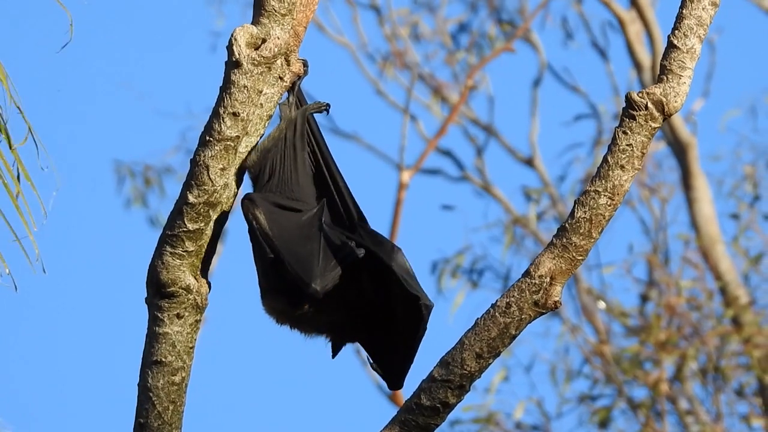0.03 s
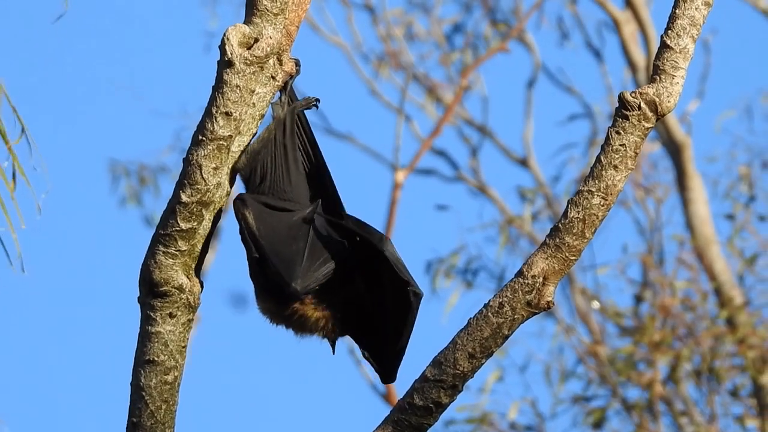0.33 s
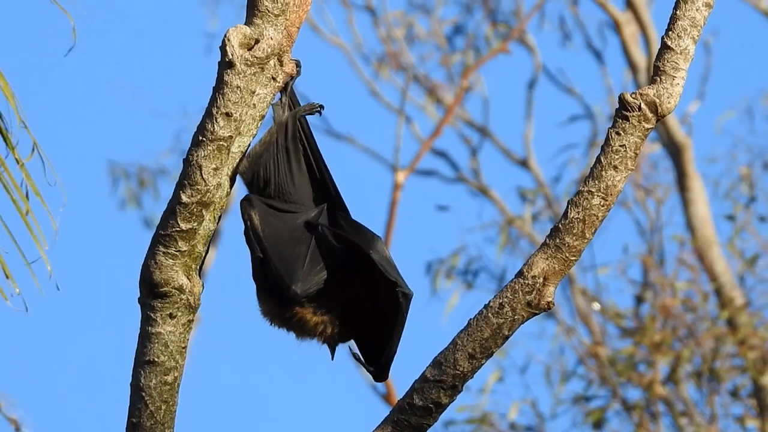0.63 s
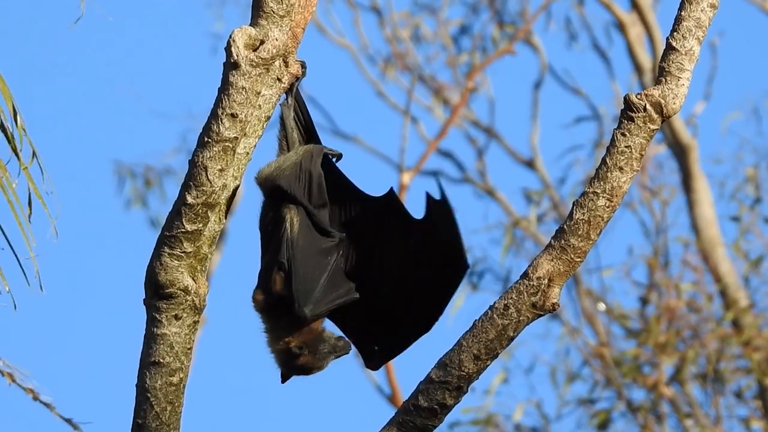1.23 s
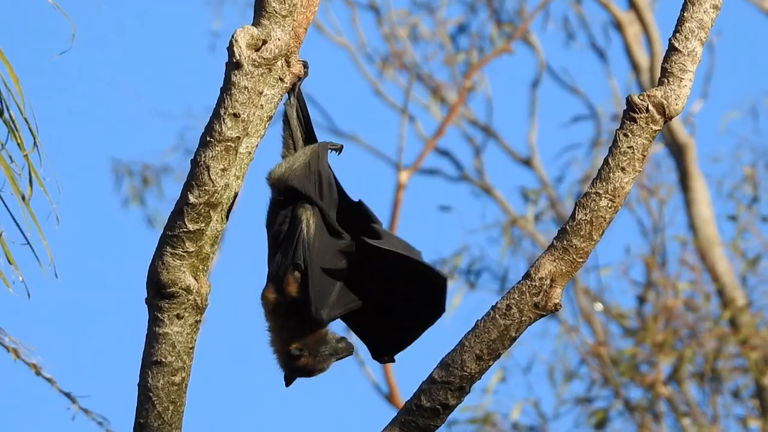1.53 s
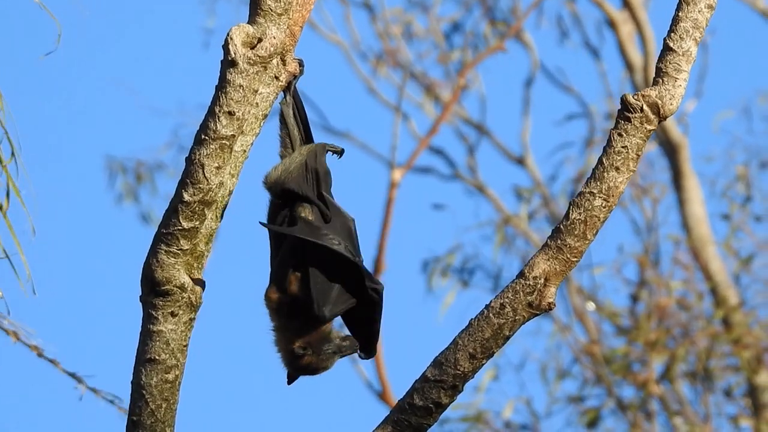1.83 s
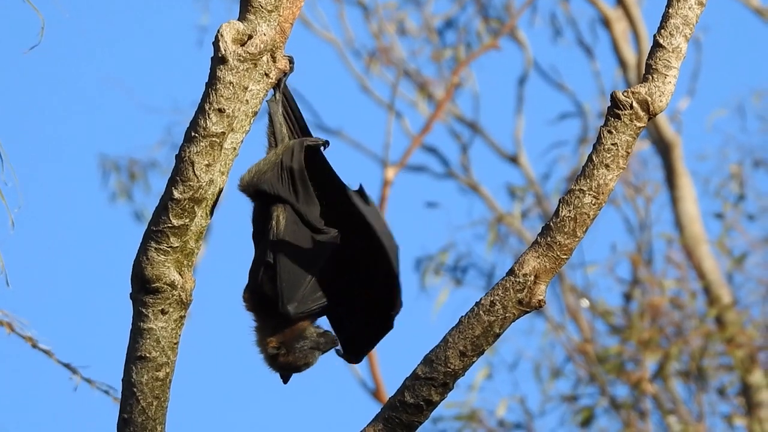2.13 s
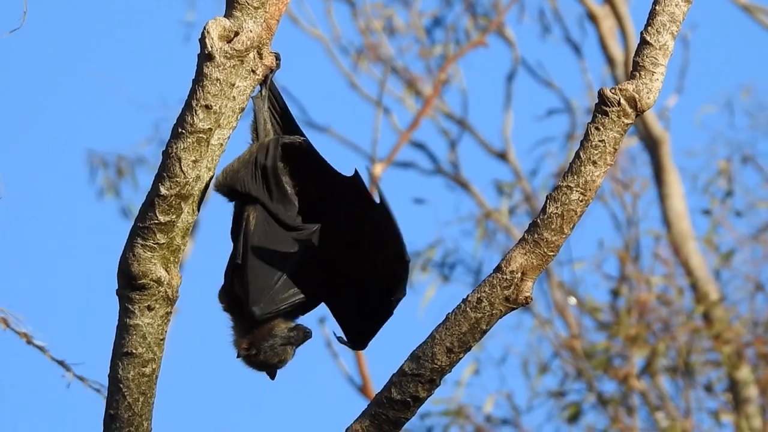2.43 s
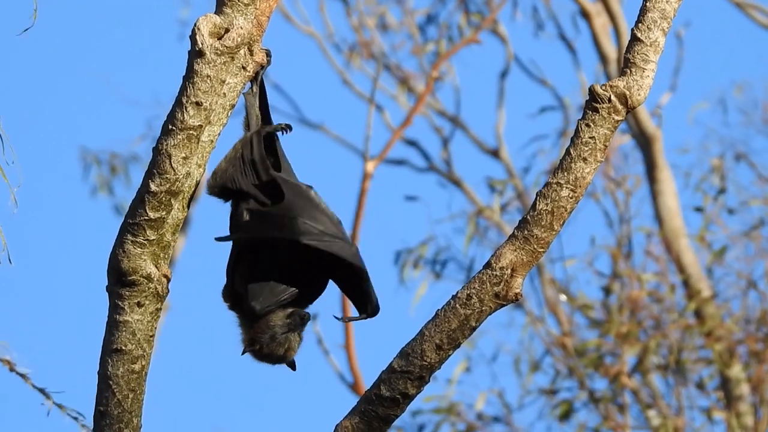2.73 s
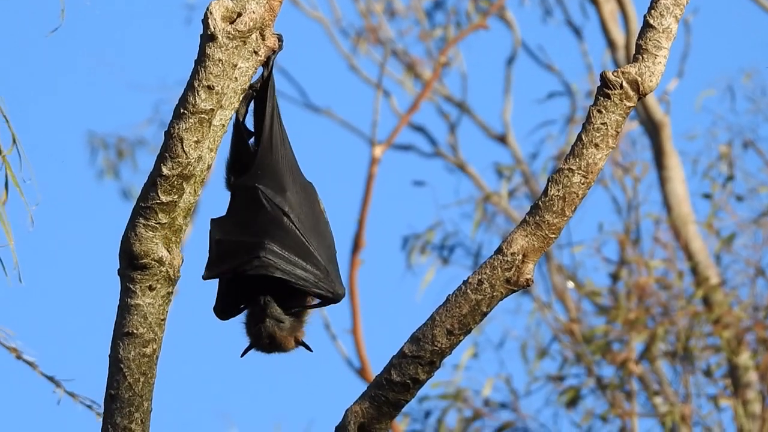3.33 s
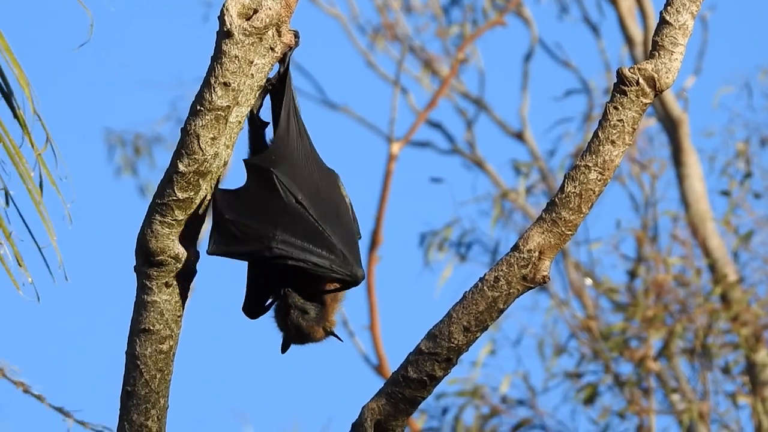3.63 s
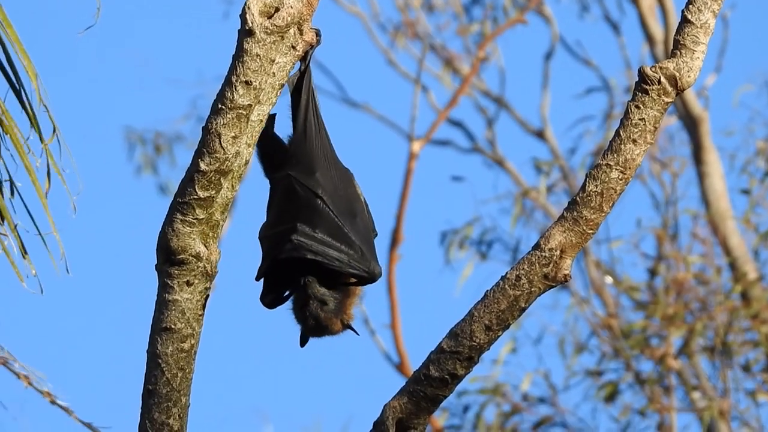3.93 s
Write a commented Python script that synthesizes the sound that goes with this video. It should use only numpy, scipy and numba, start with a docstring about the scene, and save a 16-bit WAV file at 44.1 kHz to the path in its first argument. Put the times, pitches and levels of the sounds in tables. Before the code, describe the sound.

Flying fox bats squabble in trees outdoors: one close bat repeats wavering whines that break into rasps, overlapped by its neighbours' screeches and squeals. Steady colony chatter, faint wind and a low distant hum lie underneath.

```python
"""A flying fox whines in the trees, in long phrases that break into rasps as it pushes harder.
A rival whines across it; neighbours answer with high squeals, harsh screeches and whistled squeaks.
The cries follow the source-filter principle: throat and mouth resonances shape a train of larynx
pulses, which turns rough when its cycles grow irregular. The rest of the colony chatters behind,
scattered by the branches, over faint wind and a low distant drone."""
import sys
import numpy as np
from scipy import signal
from scipy.fft import rfft, irfft
from scipy.io import wavfile
from scipy.ndimage import uniform_filter1d
from numba import njit

SR = 44100
rng = np.random.default_rng(int(sys.argv[2]) if len(sys.argv) > 2 else 0)


def unload_audio(sound):
    """Save the sound as a 16-bit wav file, at the path given as the first command line argument."""
    columns = np.transpose(np.atleast_2d(sound))
    # keep every value between -1 and 1, then stretch to whole-number steps
    steps = np.round(np.clip(columns, -1, 1) * 32767)
    wavfile.write(sys.argv[1], SR, steps.astype(np.int16))


N = 176400

NEAR_LAG_MS, MOUTH_WIDTH_HZ, MOUTH_CUT_HZ, CHEST_DB = 0.002, 1400., 2300, -32.5
THROB_DB, THROB_HZ = 5, 43.9  # rough stretches come in uneven pushes
# Near bat, one table per phrase (time [s], pitch [Hz], roughness [0-1], mouth resonance [Hz])
PHRASES = [
    [(0, 512.5, 0.59, 2620), (.1, 590, 0.51, 3080), (.17, 571.3, 0.3, 2940), (.21, 610.6, 0.7, 3030),
     (.27, 623.5, 0.49, 3200), (.3, 606.4, .4, 3030), (.33, 636, 0.55, 3200), (.4, 605, 1, 3180)],
    [(.495, 680, 0.74, 3500), (.535, 614.6, 0.7, 3100), (.55, 503, 0.42, 3100), (.605, 513.7, 0.16, 3000),
     (.665, 494.6, 0.33, 2930), (.713, 557, 0.2, 2970), (.745, 532, 0.15, 3130), (.82, 552.3, 0.15, 3200),
     (.86, 612, 0.08, 2995), (.885, 592, 0.27, 3120), (.91, 612, 0.42, 3100), (.94, 597, 0.37, 3030),
     (.96, 569, 0.3, 2700), (1.05, 562, 0.3, 2530)],
    [(1.07, 701, 0.5, 3470), (1.1, 765, 0.58, 3770), (1.135, 650, 0.52, 3380), (1.165, 665, 0.37, 3170),
     (1.2, 724, 0.05, 3000), (1.245, 666, 0.42, 3270), (1.262, 546, 0.18, 3360), (1.31, 547, 0.13, 3040),
     (1.335, 539, 0.25, 3380), (1.37, 590, 0.38, 3150), (1.42, 609, 0.67, 3450), (1.48, 615, 0.96, 3620)],
    [(1.62, 718, 0.74, 3160), (1.67, 660.5, 0.46, 2930), (1.72, 637.6, 0.4, 2980),
     (1.79, 629.4, 0.29, 3000), (1.84, 621, 0.5, 2880), (1.87, 578, 0.29, 2520), (1.9, 597.4, 0.37, 2730),
     (1.94, 674.5, 0.24, 3330), (1.97, 668, 0.56, 3300), (2.03, 634, 0.89, 3440), (2.07, 610, 0.59, 3200),
     (2.12, 604, 0.64, 3100)],
    [(2.24, 620, 0.7, 3200), (2.28, 657, 0.7, 3200), (2.32, 683, 0.33, 3100), (2.37, 711.6, 0.22, 3050),
     (2.42, 689.6, 0.48, 3440), (2.46, 674, 0.45, 3260), (2.492, 715, 0.42, 3400), (2.55, 679, 0.41, 3300),
     (2.58, 705, 0.13, 3410), (2.62, 688, 0.48, 3350), (2.67, 679.6, 0.79, 3340), (2.74, 662, 0.55, 3500),
     (2.84, 638, 0.83, 3300)],
    [(2.93, 604, 0.74, 3000), (3.05, 637, 0.45, 3240), (3.1, 613, 0.84, 3100)],
    [(3.26, 620, 0.77, 3160), (3.3, 655, 0.46, 3300), (3.35, 680, 0.29, 3270), (3.42, 657, 0.77, 3180),
     (3.56, 641, 0.95, 3140), (3.69, 610, 1.06, 2763)],
    [(3.86, 602, 0.7, 3120), (3.92, 660, 0.26, 3330), (4, 620, 0.5, 3070)],
]
# Strength of each phrase (gain [dB])
PHRASE_DB = [-1.5, -2, -0.5, -2.5, -2, -1.5, -7, -6.5]
# Vocal effort (time [s], level [dB])
EFFORT = [(0.0, -25), (0.19, -23.5), (0.21, -18.5), (0.32, -13), (0.36, -29), (0.49, -29), (0.53, -17.5),
          (0.68, -24), (0.71, -18.5), (0.76, -21.5), (0.93, -15.5), (0.95, -22), (1.02, -28), (1.07, -58),
          (1.09, -18), (1.12, -17), (1.16, -22.5), (1.4, -17.5), (1.43, -22), (1.46, -18.5), (1.47, -26),
          (1.59, -16), (1.66, -24.5), (2.03, -16), (2.06, -10), (2.07, -24), (2.18, -22), (2.25, -21),
          (2.26, -14), (2.29, -19), (2.312, -25), (2.335, -19), (2.37, -26), (2.418, -16), (2.455, -25.5),
          (2.485, -18.5), (2.53, -25), (2.58, -18), (2.625, -27), (2.665, -18), (2.73, -19), (2.74, -27),
          (2.76, -29), (2.8, -29), (2.82, -26), (2.88, -33), (2.94, -27), (3.07, -26), (3.1, -47),
          (3.25, -18), (3.29, -15), (3.42, -28), (3.56, -24), (3.75, -26), (3.91, -24), (3.95, -41),
          (3.98, -16.5), (4.0, -19)]
# Throat formants (centre [Hz], bandwidth [Hz], gain [dB])
NEAR_THROAT = [(1680, 450, -16), (4950, 1000, -12), (7400, 1400, -17)]
def near_bat():
    """Source-filter voice: larynx pulses pass a moving mouth resonance and steady throat formants."""
    out = np.zeros(N)
    highpass = signal.butter(4, MOUTH_CUT_HZ, "highpass", fs=SR, output="sos")
    for phrase, db in zip(PHRASES, PHRASE_DB):
        t = np.arange(phrase[0][0], phrase[-1][0], 1 / SR)
        rough = np.clip(curve(phrase, t, column=2), 0, 1)
        source = larynx(curve(phrase, t), rough, subharmonic=0.4 * rough)
        tract = vocal_tract(source, curve(phrase, t, column=3), MOUTH_WIDTH_HZ, NEAR_THROAT)
        voice = signal.sosfilt(highpass, tract) + undb(CHEST_DB) * source
        voice = voice / np.sqrt(uniform_filter1d(voice ** 2, size=400) + 1e-12)  # even out the power
        throb = THROB_DB * rough * np.tanh(wander(len(t), THROB_HZ))
        envelope = undb(curve(EFFORT, t) + db + throb) * gate(len(t), attack_s=0.014, release_s=0.011)
        add(out, t[0], voice * envelope)
    return place(out, pan_db=-3, lag_ms=NEAR_LAG_MS)


WAVER, WAVER_HZ, JITTER, JITTER_HZ = .02, 120, .075, 397.1  # relative pitch spread at roughness 1, rate
SHIMMER_DB, SHIMMER_HZ, BREATH = 4, 297, 0.4
def larynx(hz, rough, subharmonic=0):
    """Phonation: one pulse per cycle; roughness brings jitter, shimmer and pulsed breath noise."""
    n, harmonics = len(hz), int(13000 / hz.max())

    def pulses(phase):
        """Equal harmonics sum to pulses; strong-weak alternation adds the octave below."""
        train = np.sin((harmonics + .5) * phase) / (np.sin(phase / 2) + 1e-12) - 1
        return unit(train) * (1 + subharmonic * np.cos(phase / 2))

    steady_phase = 2 * np.pi * np.cumsum(hz * (1 + WAVER * np.sqrt(rough) * wander(n, WAVER_HZ))) / SR
    shaken_phase = steady_phase + 2 * np.pi * np.cumsum(hz * JITTER * rough * wander(n, JITTER_HZ)) / SR
    air = unit(rng.standard_normal(SR)[np.arange(n) % SR] * (1 + np.cos(shaken_phase)))
    shimmer = undb(SHIMMER_DB * np.tanh(wander(n, SHIMMER_HZ)))
    rasp = (pulses(shaken_phase) + BREATH * air) * shimmer
    return (1 - rough) ** 2 * pulses(steady_phase) + rough * rasp


def vocal_tract(source, mouth_hz, width_hz, formants):
    """Formant filtering: a moving mouth resonance in parallel with those of the throat."""
    mouth = sweep(sweep(source, mouth_hz, width_hz), mouth_hz, width_hz)
    throat = sum(undb(db) * resonate(source, hz, width) for hz, width, db in formants)
    return mouth + throat


def calls(rows, formants, arch):
    """Formant tracking: the mouth resonance follows the arching, gliding pitch of each short call."""
    out = np.zeros(N)
    for start, length, hz, rise, db, rough, mouth_hz in rows:
        u = np.linspace(-1, 1, int(length * SR))
        pitch = hz * (1 + arch * (.5 - u ** 2)) + rise * u / 2
        source = larynx(pitch, np.clip(rough, 0, 1), subharmonic=0.06)
        voice = vocal_tract(source, mouth_hz * pitch / hz, width_hz=750., formants=formants)
        add(out, start, unit(voice) * undb(db) * gate(len(u)))
    return out


# Whines (start [s], length [s], pitch [Hz], rise [Hz], level [dB], roughness [0-1], mouth [Hz])
WHINES = [(.255, .085, 775, 42, -27, .3, 3100), (.355, 0.071, 698, 5, -26.5, 0.2, 4200),
          (.585, 0.088, 632, -29, -31, 0.16, 2640), (.885, .06, 905, 92, -26, .2, 3500),
          (.96, .08, 535, -5, -32.5, .25, 2200), (1.19, .17, 600, 33, -29.5, .6, 3100),
          (1.39, .055, 835, 57, -27, .3, 4000), (1.935, .045, 612, -12, -29, .2, 4400),
          (2.12, .12, 600, 15, -31.5, .6, 2900), (2.355, .045, 720, 28, -24, .15, 2850),
          (2.47, .17, 628, -9.5, -34.5, 0.48, 3110), (2.57, .15, 719, 43.5, -33.5, 0.25, 4950)]
# Throat formants (centre [Hz], bandwidth [Hz], gain [dB])
WHINE_THROAT = [(4700, 1000, -15), (7200, 1200, -17)]
def rival_whines():
    """Mostly periodic pulses give the rival a harmonic whine close to the near bat's pitch."""
    return place(calls(WHINES, WHINE_THROAT, arch=.012), pan_db=-3, lag_ms=NEAR_LAG_MS)


# Squeals (start [s], length [s], pitch [Hz], rise [Hz], level [dB], roughness [0-1], mouth [Hz])
SQUEALS = [(.32, .1, 1131, 8, -27.5, 0.42, 4500), (.415, 0.047, 1170, 13, -24.5, .22, 4800),
           (.945, 0.11, 1212, 68, -26, .22, 4850), (1.495, 0.055, 1125, 41, -22.5, .25, 5430),
           (1.535, 0.046, 1204, 10, -23.5, 0.1, 4910), (2.128, 0.088, 1200, 20, -23, 0.3, 4800),
           (2.205, 0.063, 1250, -10, -27.5, 0.17, 6200), (3.64, 0.14, 1158, -55, -38, .4, 4500),
           (3.79, 0.09, 1220, 11, -30, 0.64, 5300)]
# Throat formants (centre [Hz], bandwidth [Hz], gain [dB])
SQUEAL_THROAT = [(1150, 2200, -10), (2420, 400, -12), (4530, 2600, -1), (6060, 910, 0)]
def squeals():
    """A fast pulse rate gives a neighbour's squeals high pitch and widely spaced harmonics."""
    return place(calls(SQUEALS, SQUEAL_THROAT, arch=0.0158), pan_db=-1, lag_ms=0.0062)


# Screeches (start [s], length [s], pitch [Hz], rise [Hz], level [dB], roughness [0-1], mouth [Hz])
SCREECHES = [(.055, .025, 915, 16, -36, .8, 6750), (.138, 0.035, 678, 28, -16, 0.37, 6200),
             (.17, 0.073, 786, -2, -25.5, .8, 4700), (.203, 0.043, 709, 3, -19, 0.27, 6660),
             (.245, 0.018, 795, -22, -20, 0.5, 6250), (.29, 0.2, 802, 14.5, -30, 0.6, 6300),
             (.503, 0.031, 720, 3, -25.5, 0.55, 4400), (.58, 0.061, 938, 18, -27.5, 0.86, 6800),
             (.87, 0.18, 896, 56.5, -24.5, 0.79, 6460), (1.085, .04, 725, -68, -23.5, 0.67, 4380),
             (1.4, 0.11, 857, 60.5, -26, 0.76, 6600), (1.52, .14, 996, -85, -26.5, 0.63, 6000),
             (1.62, 0.061, 873, 19, -29, 0.37, 4400), (1.83, 0.05, 904, 6, -45, 0.4, 5700),
             (2.02, 0.1, 850, 45.5, -28, 0.85, 6800), (2.255, .05, 926, -100, -26, 0.81, 5150),
             (2.63, 0.16, 903, 6.5, -28, 1.06, 5100), (2.8, 0.053, 842, -63, -26.5, 0.72, 5500),
             (3.31, 0.13, 897, -12, -28.5, 0.95, 5570), (3.47, 0.13, 954, -47, -27.5, 1, 6250),
             (3.825, 0.064, 1032, -9, -24.5, 0.67, 5960), (3.93, 0.051, 944, 165, -30.5, 0.7, 6400)]
# Throat formants (centre [Hz], bandwidth [Hz], gain [dB])
SCREECH_THROAT = [(4730, 390, 0.5), (5880, 3400, -12), (6820, 1050, -2.5)]
def screeches():
    """Aperiodic vibration smears the harmonics into harsh noise under high formants."""
    return place(calls(SCREECHES, SCREECH_THROAT, arch=.05), pan_db=0.5, lag_ms=0.0052)


# Whistled squeaks (start [s], length [s], pitch [Hz], rise [Hz], arch [Hz], level [dB])
SQUEAKS = [(.89, 0.041, 6980, 1, 315, -23.5), (.898, 0.0345, 4550, 400, 45, -27),
           (0.913, 0.029, 2900, 56, 21, -17), (1.43, 0.032, 3017, 0, 12, -21),
           (2.046, 0.019, 3050, 153, 27, -22), (2.058, 0.0065, 6850, -200, 5, -22),
           (2.07, 0.013, 4660, -600, 4, -22.5), (2.073, 0.011, 5150, 1204, 4, -22.5),
           (2.225, 0.068, 6030, -100, 71, -25), (2.725, 0.044, 4860, 98, 540, -22),
           (2.736, 0.012, 3180, 251, 8, -14.5), (2.799, 0.033, 5200, -300, 130, -23.5),
           (2.811, 0.025, 3247, 0, 66, -24)]
def squeaks():
    """Where a voice breaks it whistles: a sine with slight random frequency and amplitude modulation."""
    out = np.zeros(N)
    for start, length, hz, rise, arch, db in SQUEAKS:
        u = np.linspace(-1, 1, int(length * SR))
        wobble = 1 + 0.0244 * wander(len(u), hz=867)
        pitch = (hz + rise * u / 2 + arch * (1 - u ** 2)) * wobble
        shimmer = undb(-wander(len(u), JITTER_HZ))
        tone = unit(np.sin(2 * np.pi * np.cumsum(pitch) / SR) * shimmer)
        add(out, start, tone * undb(db) * gate(len(u), attack_s=0.0016, release_s=0.0016))
    return place(out, pan_db=-5, lag_ms=NEAR_LAG_MS)


# Clicks at the start of the first shriek (time [s], level before filtering [dB])
CLICKS = [(.131, -15), (.147, -15)]
# Click spectrum (frequency [Hz], gain [dB])
CLICK_SPECTRUM = [(4000, -12), (6500, 0), (8500, -16), (12500, 1), (15500, -14)]
def clicks(decay_s=.004):
    """Broadband transients: bright noise bursts that decay exponentially within milliseconds."""
    out, t = np.zeros(N), np.arange(SR // 20) / SR
    for start, db in CLICKS:
        add(out, start, rng.standard_normal(len(t)) * undb(db) * np.exp(-t / decay_s))
    return place(colour(out, CLICK_SPECTRUM), pan_db=0.5, lag_ms=0.0052)


def trees(x, t60_s=0.3, onset_s=0.0054):
    """Scattering from trunks and leaves leaves a short diffuse tail, different in each ear."""
    t = np.arange(SR // 2) / SR
    tail = rng.standard_normal((2, len(t))) * undb(-60 * t / t60_s) * np.clip(t / onset_s, 0, 1)
    tail = tail / np.sqrt((tail ** 2).sum(1, keepdims=True))
    return signal.fftconvolve(x, tail, axes=1)[:, :N]


# Response applied to the near voices (frequency [Hz], gain [dB])
TREBLE_LOSS = [(100, 4), (7300, -1), (8300, -4), (10000, -6.5), (12500, -27), (15500, -40)]
def treble_loss(voices):
    """High-frequency attenuation dulls the near voices and their scatter."""
    return colour(voices, TREBLE_LOSS)


COLONY_PITCH_HZ, COLONY_CALL_S, COLONY_ROUGH = 723.3, .075, 0.439  # medians over the calls
COLONY_SPREAD_DB, COLONY_PAN_DB, COLONY_WET = 4.5, -2, 0.4
# Spectral shaping of the colony (frequency [Hz], gain [dB])
COLONY_SPECTRUM = [(450, -21.5), (700, -8.5), (1100, -8), (1700, -3), (2050, -7), (2400, -0.5), (3200, 0.5),
                   (4100, -7.5), (5300, -7), (7100, 1.5), (8300, -18.5), (10000, -36), (12500, -80),
                   (15500, -52)]
# Loudness of the colony (time [s], level [dB])
COLONY_LEVEL = [(0, -23), (.48, -23.5), (1.05, -23.5), (1.6, -24.5), (2.3, -24), (2.75, -25), (2.89, -25),
                (3.0, -25), (3.18, -25.5), (3.5, -23.5), (4, -24)]
def colony(count=300):
    """Incoherent superposition: far calls from three directions and their scatter merge into chatter."""
    groups = np.zeros((3, N))
    for k, (when, size, pitch, glide, loud, rough, mouth) in enumerate(rng.uniform(-1, 1, (count, 7))):
        u = np.linspace(-1, 1, int(COLONY_CALL_S * 2 ** size * SR))
        hz = COLONY_PITCH_HZ * 1.6 ** pitch * (1 + .08 * glide * u - .06 * u ** 2)
        source = larynx(hz, np.clip(COLONY_ROUGH * 2 ** rough, 0, 1))
        voice = unit(0.38 * source + resonate(source, hz=4200 * 1.53 ** mouth, width=1910))
        start = (k + when) / count * N / SR - len(u) / SR / 2
        add(groups[k % 3], start, voice * undb(COLONY_SPREAD_DB * loud) * gate(len(u)))
    direct = sum(place(voices, pan_db=COLONY_PAN_DB - 3.5 * side, lag_ms=0.045 * side)
                 for voices, side in zip(groups, (-1, 0, 1)))
    scatter = trees(direct)
    coherent = place(scatter[0], COLONY_PAN_DB, lag_ms=0)  # the same tail in both ears
    diffuse_treble = colour(scatter, [(3500, -23.5), (15500, 18.5)])
    chatter = colour(direct + COLONY_WET * (coherent + diffuse_treble), COLONY_SPECTRUM)
    return unit(chatter) * undb(curve(COLONY_LEVEL, np.arange(N) / SR))


# Spectrum of wind and far noise (frequency [Hz], relative density [dB])
WIND_SPECTRUM = [(45, 3), (85, 1), (120, -2), (170, 0), (280, -4.5), (650, -5), (1200, -20), (2000, -14.5),
                 (6000, -22), (11000, -32), (15500, -48)]
def wind(level_db=-38.5, width=0.12):
    """Broadband noise, strongest in the bass, with slow random amplitude modulation."""
    mid, side = colour(rng.standard_normal((2, N)), WIND_SPECTRUM)
    air = unit(mid) + width * unit(side) * np.array([[1], [-1]])
    return air * undb(level_db + 1.7 * wander(N, hz=5.28))


# Bands of the distant drone (centre [Hz], bandwidth [Hz], level [dB])
DRONE_BANDS = [(64.5, 1.5, -41.5), (53.9, 9.5, -48.5), (89.6, 10, -50), (192.1, 8.5, -51)]
def drone():
    """Narrow-band noise: low resonances under random excitation give a wavering hum."""
    hum = sum(undb(db) * unit(resonate(rng.standard_normal(N + SR), hz, width)[SR:])
              for hz, width, db in DRONE_BANDS)
    return place(hum, pan_db=-2.6, lag_ms=0)


def undb(db):
    """Decibels to amplitude ratio."""
    return 10 ** (np.asarray(db) / 20)


def unit(x):
    """Normalisation to rms 1."""
    return x / np.sqrt(np.mean(x ** 2) + 1e-18)


def curve(rows, t, column=1):
    """Linear interpolation through a column of a table."""
    rows = np.array(rows, float)
    return np.interp(t, rows[:, 0], rows[:, column])


def wander(n, hz):
    """Random fluctuation of rms 1 with hz new values a second."""
    at = np.arange(n) * hz / SR
    return unit(np.interp(at, np.arange(4096), rng.standard_normal(4096)))


def colour(x, points):
    """Zero-phase filter through (frequency [Hz], gain [dB]) points, falling steeply beyond the ends."""
    hz, db = np.array(points, float).T
    log_f = np.log(np.fft.rfftfreq(2 * N, 1 / SR) + 1)
    beyond = np.maximum(np.log(hz[0]) - log_f, 0) + np.maximum(log_f - np.log(hz[-1]), 0)
    gain = undb(np.interp(log_f, np.log(hz), db) - 74 * beyond)
    return irfft(rfft(x, 2 * N) * gain)[..., :N]


def resonate(x, hz, width):
    """Two equal resonators in cascade, for steep skirts."""
    b, a = signal.iirpeak(hz, hz / width, fs=SR)
    return signal.lfilter(b, a, signal.lfilter(b, a, x))


@njit
def sweep(x, hz, width):
    """State-variable resonator: a band-pass whose centre moves."""
    y, band_state, low_state = np.empty(len(x)), 0., 0.
    for i in range(len(x)):
        g, damping = np.tan(np.pi * hz[i] / SR), width / hz[i]
        band = (band_state + g * (x[i] - low_state)) / (1 + g * (g + damping))
        band_state = 2 * band - band_state
        low_state += 2 * g * band
        y[i] = damping * band
    return y


def gate(n, attack_s=0.0096, release_s=0.019):
    """Amplitude envelope with quarter-sine edges."""
    t = np.arange(n) / SR
    return np.sin(np.pi / 2 * np.clip(np.minimum(t / attack_s, (n / SR - t) / release_s), 0, 1))


def add(out, start, x):
    """Superposition of a sound at its start time."""
    i = int(start * SR)
    lo, hi = max(i, 0), min(i + x.shape[-1], N)
    if hi > lo:
        out[..., lo:hi] += x[..., lo - i:hi - i]


def place(x, pan_db, lag_ms):
    """Interaural differences: left minus right level, and the delay of the left channel."""
    delay = np.exp(-2j * np.pi * np.fft.rfftfreq(N, 1 / SR) * lag_ms / 1000)
    left = irfft(rfft(x) * delay, N)
    gains = undb(np.array([[pan_db], [-pan_db]]) / 2)
    return np.array([left, x]) * gains / gains.mean()


def scene():
    """Superposition of the near voices, their scatter, the colony, the wind and the drone."""
    voices = near_bat() + squeaks() + clicks() + rival_whines() + squeals() + screeches()
    return treble_loss(voices + undb(-8) * trees(voices)) + colony() + wind() + drone()


def record(dry):
    """Soft saturation rounds the highest peaks; a steep low-pass limits the bandwidth."""
    ceiling, cutoff_hz = .95, 15600
    rounded = dry / (1 + (dry / ceiling) ** 8) ** (1 / 8)
    return signal.sosfilt(signal.ellip(8, .2, 70, cutoff_hz, fs=SR, output="sos"), rounded)


dry = scene()
out = record(dry)
unload_audio(out)
```